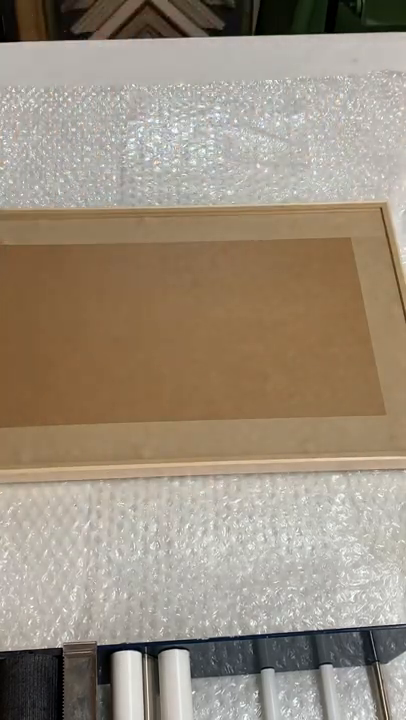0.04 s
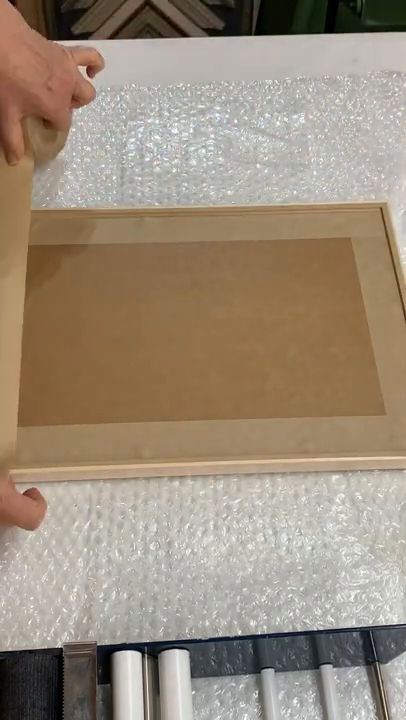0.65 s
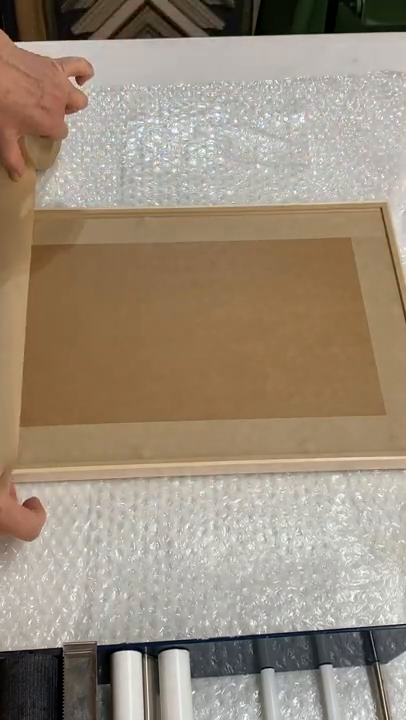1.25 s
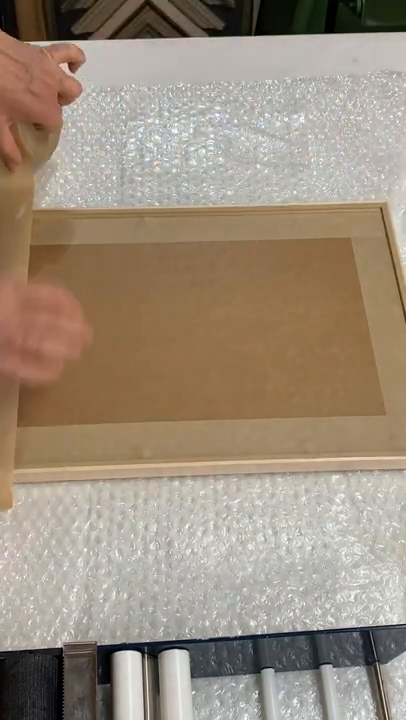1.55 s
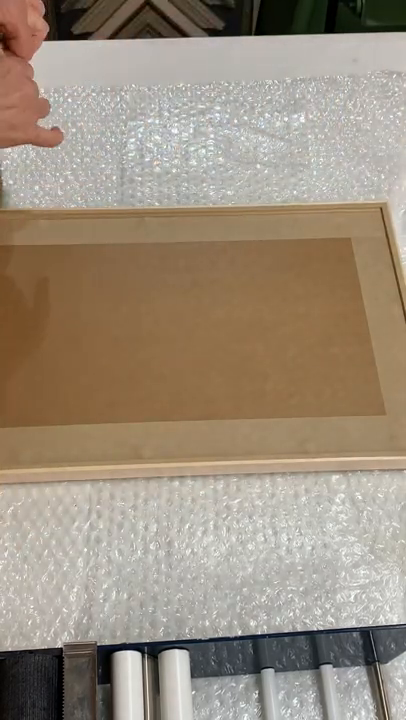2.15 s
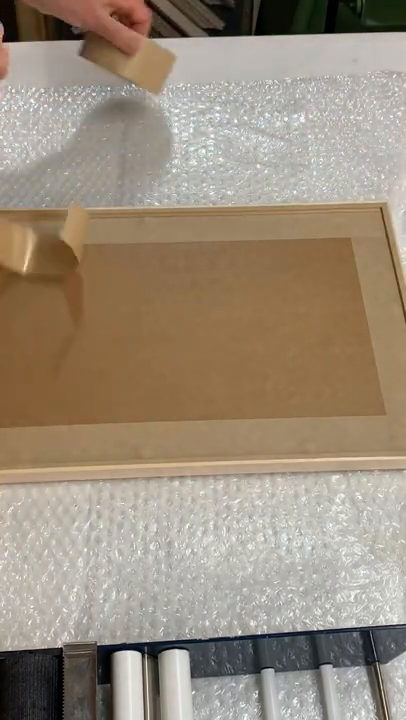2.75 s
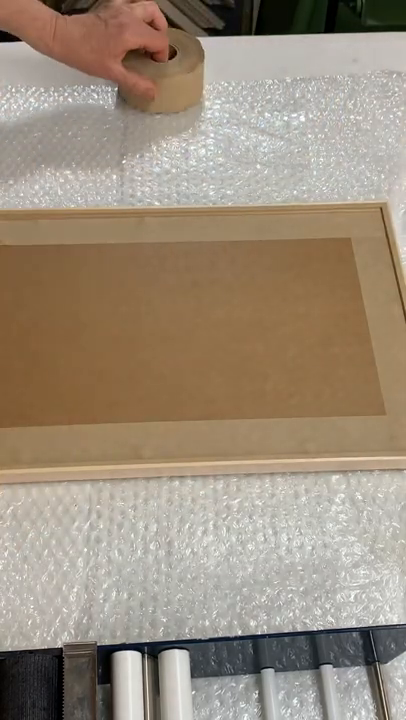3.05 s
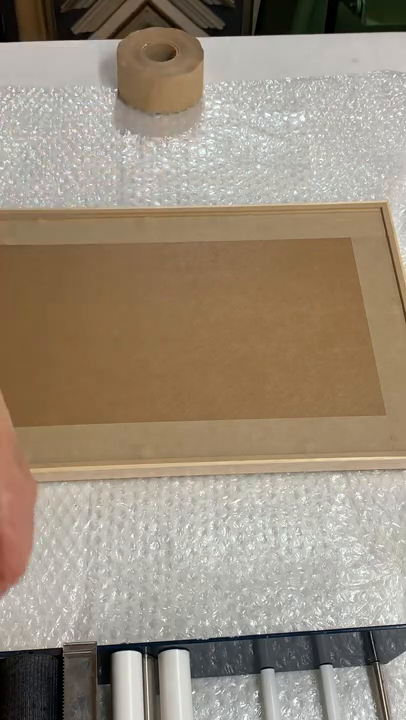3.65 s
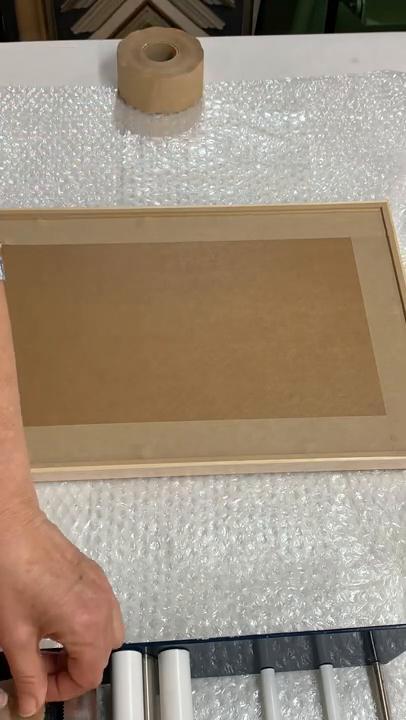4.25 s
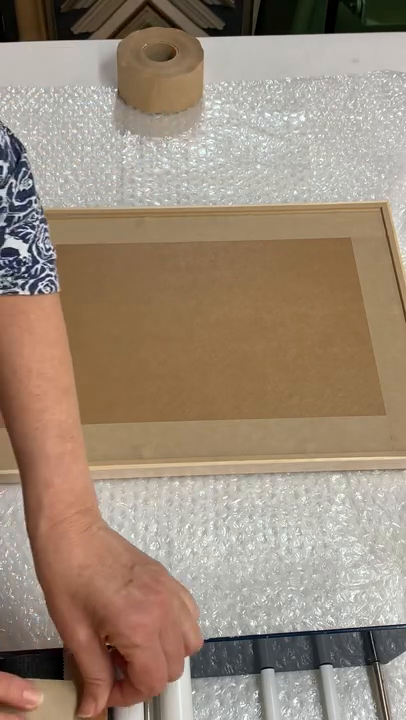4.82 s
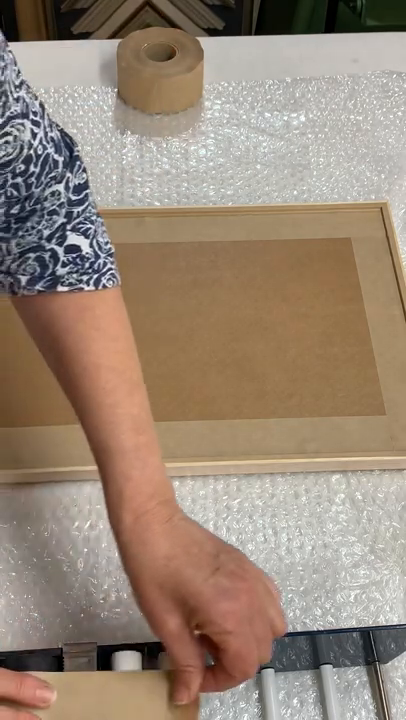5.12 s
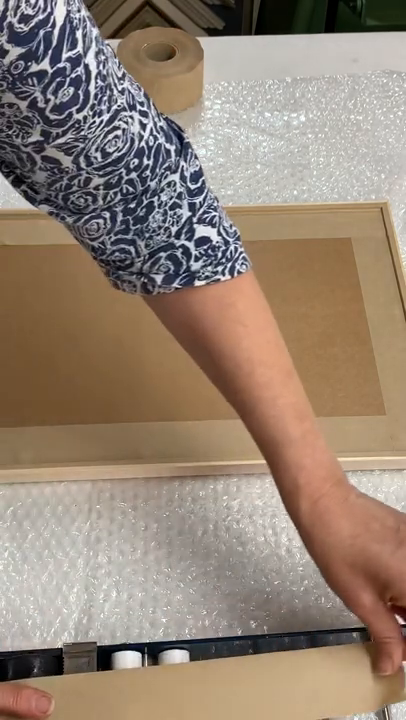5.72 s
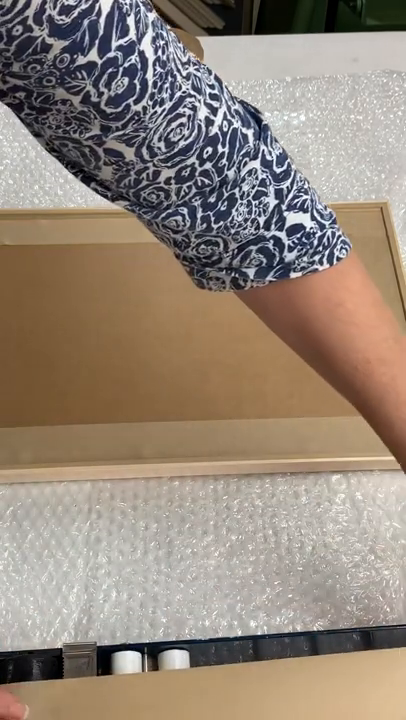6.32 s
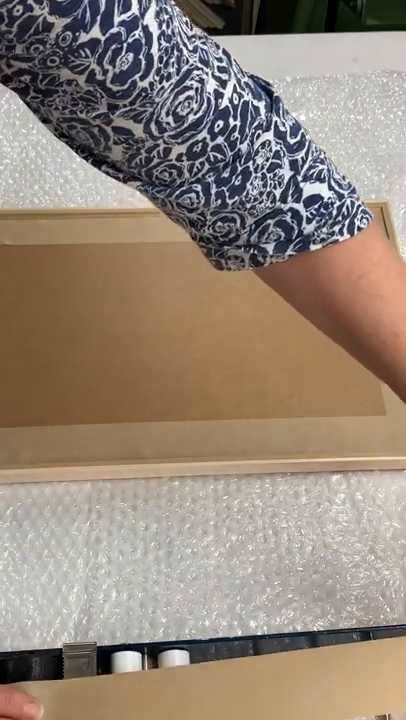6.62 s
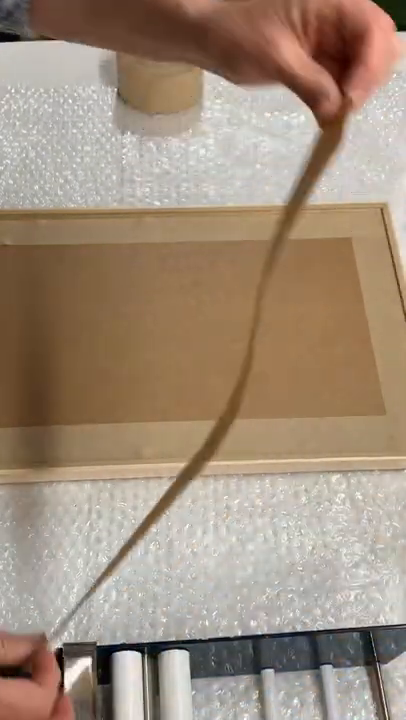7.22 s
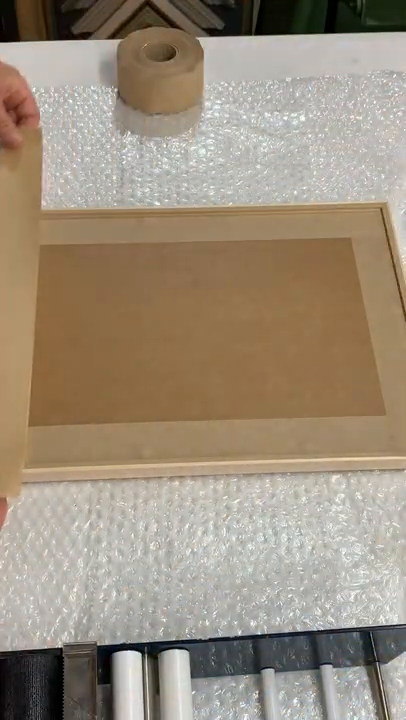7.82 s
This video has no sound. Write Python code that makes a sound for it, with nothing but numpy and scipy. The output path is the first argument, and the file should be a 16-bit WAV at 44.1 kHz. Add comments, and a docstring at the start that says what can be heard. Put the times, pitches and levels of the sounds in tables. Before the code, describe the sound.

In a small, quietly rumbling workshop, a short rasp of unrolling paper tape is followed by soft rubbing, sharp crinkles and a quick rip. Bubble wrap rustles under the roll and small bumps sound on the bench. Then, close by, the strip slides through a roller moistener with a hiss and a wavering, whistle-like squeak. It comes free with a thin metallic clink and a few faint paper rustles.

```python
"""A framing bench in a small workshop, where someone works with gummed paper tape.
The tape rasps off its roll, rustles as hands smooth it along the frame, then creaks and tears, fibre
by fibre. The roll is set down on bubble wrap. The strip hisses through a moistener whose roller sticks
and slips, which makes it squeal, and a metal part clinks as the strip comes free.
Small bumps ring the bench, and the room rumbles softly underneath."""
import sys
import numpy as np
from scipy import signal
from scipy.fft import rfft, irfft, next_fast_len
from scipy.io import wavfile

SR = 44100
rng = np.random.default_rng(int(sys.argv[2]) if len(sys.argv) > 2 else 0)


def generate_wav(signal):
    """Clip the signal to [-1, 1] and save it as 16-bit WAV at the path in sys.argv[1]."""
    frames = np.transpose(np.atleast_2d(signal))
    scaled = np.clip(frames, -1, 1) * 32767
    pcm = np.round(scaled).astype(np.int16)
    wavfile.write(sys.argv[1], SR, pcm)


N = 347085
TIME = np.arange(N) / SR
SIZE = next_fast_len(N + SR)
FREQS = np.arange(SIZE // 2 + 1) * SR / SIZE

# An attack is the time a sound takes to build up; a t60 is the time it takes to fade by 60 dB.
STROKE_ATTACK_S, STROKE_T60_S = 0.032, 0.12   # a hand moving over the paper
FEED_ATTACK_S, FEED_T60_S = 0.04, 0.15   # the strip moving through the moistener

# A colour says how strong the low and high frequencies of a sound are, compared with each other.
# bright crinkling paper: f/Hz, level/dB
CRINKLE_COLOUR = [(1500, -44), (4000, -13), (6500, -6.5), (8500, 4), (11000, -0.5), (15500, -6)]
# rustling bubble wrap, also used for the paper's ticks: f/Hz, level/dB
WRAP_COLOUR = [(300, -8.5), (700, -9.5), (1300, 2.5), (3000, 4), (5000, 9.5), (7000, 1.5), (8700, 10),
               (11000, 2.5), (15500, -2)]
# paper dragging over a surface: f/Hz, level/dB
DRAG_COLOUR = [(300, -19), (600, -2.5), (850, -14), (2000, -4), (3500, 1.5), (5500, 8), (7000, 5),
               (9000, 4.5), (11500, 3), (13500, 1), (15500, 0.5)]


def from_db(db):
    """Turn decibels into a number to multiply by."""
    return 10 ** (np.asarray(db) / 20)


def rms_one(x):
    """Scale a signal so that its average power is one."""
    return x / np.sqrt(np.mean(x ** 2) + 1e-20)


def level(rows, column=1):
    """Join a table's dB values into a gain over time, fading to silence outside its first and last row."""
    rows = np.array(rows)
    outside_s = np.maximum(rows[0, 0] - TIME, TIME - rows[-1, 0])
    return from_db(np.interp(TIME, rows[:, 0], rows[:, column])) * np.clip(1 - outside_s / .008, 0, 1)


def at_freqs(points):
    """Join a table's points with straight lines on a log-frequency axis."""
    hz, value = np.transpose(points)
    return np.interp(np.log(FREQS + 1), np.log(hz), value)


def colour(x, spectrum):
    """Give a sound a colour; white noise keeps its power."""
    return irfft(rfft(x, SIZE) * rms_one(from_db(at_freqs(spectrum))), SIZE)[..., :N]


def drift(rate_hz):
    """A smooth random wobble, about one in size; a higher rate wobbles faster."""
    step = 20   # samples between random values
    pole = np.exp(-2 * np.pi * rate_hz * step / SR)
    slow = signal.lfilter([1], [1, -2 * pole, pole * pole], rng.standard_normal(N // step + 2002))[2000:]
    return np.interp(np.arange(N) / step, np.arange(len(slow)), rms_one(slow))


def noise(width):
    """Stereo white noise; width is the size of the part that differs between left and right."""
    mid, side = rng.standard_normal((2, N))
    return rms_one(mid + width * side * np.array([[1], [-1]]))


def grains(per_s, spread_db, smooth):
    """Fibres letting go: random clicks of uneven size, plus a share of smooth rubbing noise."""
    sizes = from_db(spread_db * np.minimum(rng.exponential(1, N), 4)) * rng.choice([-1, 1], N)
    clicks = rms_one(sizes * (rng.random(N) < per_s / SR))
    return rms_one(clicks + smooth * noise(width=0.96))


def ring(x, hz, t60):
    """One note of an object: every click in x starts a fading sine wave."""
    decay, turn = from_db(-60 / (t60 * SR)), 2 * np.pi * hz / SR
    return signal.lfilter([0, np.sin(turn)], [1, -2 * decay * np.cos(turn), decay * decay], x + 1e-18)


def burst(start, t60, rise):
    """Loudness of one hit: it rises quickly, then dies away."""
    out, at = np.zeros(N), int(start * SR)
    age = TIME[:min(N - at, SR // 2)]
    out[at:at + len(age)] = (1 - np.exp(-age / rise)) * np.exp(-np.log(1000) * age / t60)
    return out


def crack(start, t60, rise, tail_t60, tail_db):
    """Loudness of a brief crack with a weaker tail."""
    return burst(start, t60, rise) + from_db(tail_db) * burst(start, tail_t60, rise)


def gesture(start, length, attack, t60):
    """Loudness of one movement: it builds up, holds, then dies away."""
    age = TIME - start
    return np.clip(age / attack, 0, 1) * from_db(-60 * np.clip((age - length) / t60, 0, 2))


def over_bench(x, lag_s, echo_db, wander=0.186):
    """The bench top throws back an echo whose path changes as the hands move, so the colour shifts."""
    delay = lag_s * SR * np.exp(wander * drift(1.5))
    echo = np.array([np.interp(np.arange(N) - delay, np.arange(N), side) for side in x])
    return (x + from_db(echo_db) * echo) / np.sqrt(1 + from_db(2 * echo_db))


def rumble(steady_db=-74, uneven_db=2.5):
    """The room rumbles, weight thumps on the bench now and then, and a low shuffling comes and goes."""
    # dull thumps: t/s, level/dB
    thump_rows = [(2.72, -75), (2.961, -59), (3.09, -59.5), (3.71, -53), (4.119, -55), (7.049, -56)]
    # the shuffling: t/s, level/dB
    shuffle_rows = [(0, -62.5), (.3, -74), (.6, -73.5), (1.25, -76), (1.45, -66.5), (2.1, -65.5),
                    (3.45, -71), (3.75, -67.5), (5.2, -62.5), (6.7, -73), (7.1, -64.5), (7.87, -67.5)]
    # the deep rumble, then the shuffling: f/Hz, level/dB
    deep_colour = [(20, -26.5), (40, -2), (60, 4.5), (95, 6.5), (150, 0.5), (250, -0.5), (340, -9),
                   (480, -24.5), (900, -33.5), (3000, -33.5)]
    shuffle_colour = [(50, -30.0), (150, -17.5), (260, -2.0), (500, -14.5), (2000, -26.5)]
    thumps = sum(from_db(db) * burst(s, t60=0.27, rise=0.003) for s, db in thump_rows)
    shuffle = level(shuffle_rows)
    deep = colour(noise(width=.14), deep_colour)
    wide = colour(noise(width=1.56), shuffle_colour)
    deep_gain = from_db(steady_db) + from_db(-2) * shuffle + thumps
    wide_gain = from_db(-1 + uneven_db * drift(19)) * shuffle
    return deep_gain * deep + wide_gain * wide


def unroll(draw_s=0.57, full_speed_db=-35, catch_db=-9):
    """Tape leaves the roll with a fine rasp and small catches; both follow the speed of the arm."""
    # the bright rasp: f/Hz, level/dB
    rasp_colour = [(200, -21), (500, -15.5), (1000, -17), (2200, -13), (3000, -9), (4000, 2.5),
                   (6000, -4.5), (8200, 0.5), (11000, 1), (15500, -1.5)]
    speed = np.abs(np.sin(np.pi * np.minimum(TIME / draw_s, 1)))
    rasp = grains(per_s=6500, spread_db=5.0, smooth=1.0) * from_db(1.3 * drift(22))
    catches = from_db(catch_db) * grains(per_s=300, spread_db=2.5, smooth=0)
    tape = colour(rms_one(rasp + catches), rasp_colour)
    return from_db(full_speed_db) * speed ** 0.86 * over_bench(tape, lag_s=.0022, echo_db=-6.5)


def ticks(per_s=9, tick_db=-76, fade_s=0.0037):
    """The loose strip ticks faintly at random as it is laid along the frame."""
    clicks = np.abs(grains(per_s=per_s, spread_db=3.0, smooth=0)[0])
    cracks = signal.lfilter([1], [1, -np.exp(-1 / (fade_s * SR))], clicks + 1e-18) * noise(width=1.0)
    laying = gesture(start=.75, length=1, attack=STROKE_ATTACK_S, t60=STROKE_T60_S)
    return from_db(tick_db) * laying * rms_one(colour(cracks, WRAP_COLOUR))


def snaps():
    """Paper buckles: each snap is a short shower of tiny clicks with a crisp part and a dull part."""
    # the snaps: t/s, relative level/dB, extra level of the dull part/dB, t60/s
    snap_rows = [(0.798, -60, 8, 0.01), (0.877, -36, -14, 0.0065), (1.02, -47, 10, 0.012),
                 (1.185, -61, 6, 0.02), (1.249, -47, -16, .01), (1.272, -45, 6.5, 0.015),
                 (1.364, -43, 0, 0.031), (1.3849, -20.5, 2.5, 0.0094), (1.3909, -30.5, 10, 0.0071),
                 (1.462, -44, 6.5, 0.094), (1.860, -50, 18, .012), (2.003, -40, -7, 0.095),
                 (2.077, -44, -2, 0.087), (2.118, -32, -5, 0.014), (2.220, -32, -11, 0.016),
                 (2.241, -9, -15.5, 0.023), (2.249, -13, -32, 0.017), (2.277, -19, -20, .008),
                 (2.361, -20, -18, .008), (2.641, -33.5, 10.5, 0.015), (2.647, -35, 4, 0.018),
                 (2.655, -25.5, -23, 0.087), (2.698, -24, -3.5, 0.019), (2.766, -54, 11, 0.017),
                 (2.83, -46.5, 14, 0.016), (2.8707, -7.5, -20, 0.0065), (3.209, -34.5, -6.5, 0.053),
                 (3.214, -27.5, 0, 0.033), (3.915, -19, -4, 0.019), (4.417, -27.5, -12, .015),
                 (4.475, -37, 3, 0.018), (4.946, -40.5, 8.5, 0.014), (6.468, -26.5, -14, 0.031),
                 (6.526, -34, -31, 0.012), (6.785, -35, -28, 0.021), (7.032, -31.5, -13, 0.14),
                 (7.196, -42.5, -8, 0.041), (7.251, -43, -18, .02), (7.494, -37.5, -7, 0.083)]
    # the dull part: f/Hz, level/dB
    dull_colour = [(300, -14), (700, -5.5), (1200, 0), (2000, 0.5), (3700, 4), (6000, 3), (12000, -57)]
    crisp, dull = np.zeros((2, N))
    for s, db, dull_db, t60 in snap_rows:
        crisp += from_db(db) * crack(s, t60, rise=0.00025, tail_t60=0.12, tail_db=-35)
        dull += from_db(db + dull_db) * crack(s, t60, rise=0.00066, tail_t60=0.065, tail_db=-22)
    shower = grains(per_s=4100, spread_db=-4.0, smooth=2.4)
    return (from_db(-11.0) * colour(crisp * shower, CRINKLE_COLOUR)
            + from_db(-7.5) * colour(dull * shower, dull_colour))


def handling():
    """Hands smooth and carry the strip: skin rubs softly while the paper crinkles."""
    # hand strokes: t/s, length/s, relative rub level/dB, relative crinkle level/dB
    strokes = [(0.883, 0.06, -66.5, -81), (1.055, 0.087, -74.5, -90), (1.358, 0.12, -59.5, -64.5),
               (1.48, 0.089, -64, -84), (1.6, 0.069, -64, -100), (1.781, 0.13, -65, -80),
               (1.949, 0.21, -64.5, -79), (6.783, 0.052, -61.5, -53.5), (7.116, 0.096, -68, -72.5),
               (7.233, 0.1, -74, -87), (7.468, 0.059, -58.5, -57), (7.528, 0.13, -63.5, -83),
               (7.793, 0.061, -66, -71)]
    # skin on paper: f/Hz, level/dB
    rub_colour = [(300, 1.5), (700, -35), (1400, -2), (2200, -3.5), (3300, 5.5), (5000, 10.5),
                  (7000, -10.5), (10000, -51), (15000, -47)]
    soft, crisp = np.zeros((2, N))
    for s, length, rub_db, crinkle_db in strokes:
        stroke = gesture(s, length, STROKE_ATTACK_S, STROKE_T60_S)
        soft += from_db(rub_db) * stroke
        crisp += from_db(crinkle_db) * stroke
    pressure = from_db(3.84 * drift(55))
    rub = colour(soft * pressure * grains(per_s=1300, spread_db=-3.0, smooth=2.0), rub_colour)
    crinkle = colour(crisp * pressure * grains(per_s=1500, spread_db=-8.0, smooth=0.32), CRINKLE_COLOUR)
    return from_db(6.0) * rub + from_db(5.0) * crinkle


def knocks(ring_db=-38, hollow_db=-4, spot_db=4):
    """Each bump is a scuff with a hollow note; the spot it lands on changes how the bench rings."""
    # bumps on frame, bench and moistener: t/s, relative level/dB, centre f/Hz, t60/s
    bumps = [(1.86, -20.5, 1730, 0.013), (2.24, -37, 700, 0.11), (2.539, -31.5, 550, 0.063),
             (3.062, -34, 1280, 0.038), (3.214, -29, 2230, 0.044), (3.529, -34, 1880, 0.018),
             (3.705, -41.5, 1170, 0.067), (3.712, -43, 220, .1), (3.781, -38, 705, 0.016),
             (3.913, -30, 1360, 0.072), (4.07, -31.5, 1170, 0.027), (4.124, -41, 520, 0.06),
             (4.128, -39, 257, 0.12), (4.3, -42.5, 640, 0.16), (4.378, -20.5, 1370, 0.022),
             (4.476, -34, 1130, 0.052), (4.597, -41, 804, 0.053), (4.897, -39, 620, 0.028),
             (4.944, -41, 546, .05), (5.035, -41.5, 200, 0.13), (5.437, -49, 520, .05),
             (5.633, -43, 546, 0.09), (6.007, -41, 950, .04), (6.012, -46, 260, .12),
             (6.413, -46.5, 710.5, 0.12), (6.881, -41, 906, 0.16), (6.901, -35, 1160, 0.041),
             (7.037, -29.5, 1490, 0.061), (7.157, -41.5, 1400, 0.061), (7.379, -51.5, 870, 0.22),
             (7.67, -44, 1216, 0.084), (7.729, -41, 1240, 0.095)]
    # notes of the bench and the things on it: f/Hz, relative level/dB, t60/s
    bench_notes = [(552, -10, 0.12), (830, -24, 0.044), (1020, -18.5, 0.12), (1284, -5, 0.054),
                   (1800, -6, 0.03), (1905, -1, 0.02), (2430, -10, 0.028), (2690, -25, 0.044)]
    white, force = noise(width=0.62), np.zeros((2, N))
    for s, db, hz, t60 in bumps:
        band = signal.butter(1, [hz / 2, min(hz * 1.62, SR / 3)], "band", fs=SR, output="sos")
        hollow = rms_one(signal.lfilter(*signal.iirpeak(hz, Q=7, fs=SR), white))
        scuff = rms_one(rms_one(signal.sosfilt(band, white)) + from_db(hollow_db) * hollow)
        force += from_db(db) * burst(s, t60, rise=0.08 * t60) * scuff   # soft bumps rise and fade slowly
    force = signal.sosfilt(signal.butter(2, 3500, fs=SR, output="sos"), force)
    body = np.zeros((2, N))
    for hz, db, t60 in bench_notes:
        spot = from_db(spot_db * np.tanh(drift(3)))
        body += from_db(db) * ring(force * spot, hz, t60)
    return from_db(-7.5) * (force + from_db(ring_db) * body)


def creak(fade_s=0.00096):
    """Just before it tears, the tight paper sticks and slips under a finger."""
    # the creak: t/s, slips per second, relative level/dB
    creak_rows = [(2.119, 170, -42), (2.143, 110, -42), (2.175, 110, -42), (2.2, 130, -56)]
    s, per_s, _ = np.transpose(creak_rows)
    rate = np.interp(TIME, s, per_s) * from_db(0.44 * drift(36))
    slip_count = np.floor(np.cumsum(rate) / SR)
    slips = np.diff(slip_count, prepend=0) * level(creak_rows, column=2)
    scuffs = signal.lfilter([1], [1, -np.exp(-1 / (fade_s * SR))], slips) * noise(width=0.49)
    return from_db(-7) * colour(scuffs, DRAG_COLOUR)


def tear(fast_tear_db=-27.5, single_fibres_db=-4.5):
    """Fibres break in clumps and shake the tight sheet; single ones stand out while the tear is slow."""
    # the tear crossing the strip: t/s, relative crackle level/dB, relative sheet level/dB
    tear_rows = [(2.239, -58, -48.5), (2.242, -38.5, -39.5), (2.315, -42.5, -55.5), (2.417, -37.5, -59.5),
                 (2.46, -30.5, -47.5), (2.499, -22.5, -43), (2.549, -33, -34.5), (2.577, -58.5, -60.5),
                 (2.6, -61.5, -60)]
    # slow tearing, fast tearing and the flapping sheet: f/Hz, level/dB
    slow_colour = [(600, -37.5), (1200, -11), (2200, -17.5), (3400, -4.5), (5500, -16.5), (7300, -11.5),
                   (8400, 0.5), (10000, -5.5), (11700, 2.5), (13300, 0), (15500, -8)]
    fast_colour = [(600, -38), (1100, -14), (2200, -14.5), (5000, -10), (6300, -3.5), (7200, -5),
                   (8100, 3.5), (9100, -3.5), (10700, -4.5), (12200, -4.5), (13200, -7), (14500, -14),
                   (15500, -15.5)]
    sheet_colour = [(250, -20.5), (420, -22.5), (540, 13.5), (680, -1.5), (850, 6), (1250, 3.5), (1650, -6),
                    (2800, -7.5), (5000, -6)]
    breaks = grains(per_s=8900, spread_db=5.0, smooth=1.0) * from_db(1.3 * drift(197))
    force = level(tear_rows)
    fast = np.clip(force / from_db(fast_tear_db), 0, 1) ** 2   # 1 when the tear runs freely
    single = from_db(single_fibres_db) * grains(per_s=470, spread_db=5.0, smooth=0)
    slow_crackle = colour((breaks + single) * force * np.sqrt(1 - fast), slow_colour)
    fast_crackle = colour(breaks * force * np.sqrt(fast), fast_colour)
    sheet = colour(breaks * level(tear_rows, column=2), sheet_colour)
    return from_db(1.0) * (slow_crackle + fast_crackle) + from_db(-4.5) * sheet


def bubble_wrap():
    """Plastic bubbles rustle as the roll is carried over them and set down."""
    # roll and hand brush the wrap: t/s, length/s, relative level/dB
    brushes = [(2.638, 0.063, -47), (2.711, 0.095, -63), (2.865, 0.18, -56.5), (3.046, 0.019, -52),
               (3.192, 0.015, -66), (3.702, 0.11, -66)]
    touch = sum(from_db(db) * gesture(s, length, attack=0.006, t60=0.28) for s, length, db in brushes)
    rustle = grains(per_s=1400, spread_db=-3.5, smooth=0.93) * from_db(1.0 * drift(40))
    return from_db(2.5) * colour(rustle * touch, WRAP_COLOUR)


def feeding(slowing_db_per_s=4.5):
    """The strip's speed through the moistener, as a gain: each move slows as the arm stretches out."""
    # short pushes, then one long pull: t/s, length/s, relative level/dB
    moves = [(3.876, 0.03, -39.5), (3.943, 0.082, -50), (4.066, 0.046, -52), (4.135, 0.025, -52),
             (4.206, 0.02, -56), (4.296, 0.014, -49), (4.359, 0.063, -61), (4.506, 0.1, -49.5),
             (4.931, 1.49, -47.5)]
    feed = np.zeros(N)
    for s, length, db in moves:
        slowing_db = slowing_db_per_s * np.maximum(TIME - s, 0)
        feed += from_db(db - slowing_db) * gesture(s, length, FEED_ATTACK_S, FEED_T60_S)
    return feed


def drag(feed, waver_db=5.5):
    """The strip hisses over the moistener's edge; the metal's notes come and go as the contact shifts."""
    # notes of the thin sheet metal: f/Hz, relative level/dB
    metal_notes = [(3350, 4.5), (3800, -1.5), (5400, 12), (5880, 8), (6150, 8.5), (6400, 8.5), (6550, 18),
                   (6680, 19), (6930, 19), (7280, 18), (7550, -1.5), (7730, 5.5)]
    friction = grains(per_s=3500, spread_db=-6.5, smooth=1.0) * from_db(0.74 * drift(29)) * feed
    scrape = noise(width=1.0)
    metal = sum(from_db(db + waver_db * drift(4.6)) * ring(scrape, hz, t60=0.11) for hz, db in metal_notes)
    # near its end the strip presses harder on the edge
    end_press = gesture(start=6.15, length=0.31, attack=0.12, t60=FEED_T60_S)
    pressure = from_db(-8) * feed + from_db(-55.5) * end_press
    hiss = over_bench(colour(friction, DRAG_COLOUR), lag_s=.0016, echo_db=-5.5)
    return from_db(3.5) * (hiss + pressure * rms_one(metal))


def chatter(feed, rough_grip):
    """The turning roller rasps in uneven slips, more under a fast strip or a rough squeal."""
    # one long turn, then a flick from the strip's end: t/s, length/s, relative level/dB, t60/s
    turns = [(3.91, 2.29, -62, 3.6), (6.786, 0.064, -57.5, 0.086)]
    # the roller's broad ring: f/Hz, level/dB
    roller_colour = [(700, -73), (950, -10), (1150, 0), (1380, 3.5), (1600, -2), (1740, -2.5), (1880, -8),
                     (2500, -15.5)]
    turning = sum(from_db(db) * gesture(s, length, FEED_ATTACK_S, t60) for s, length, db, t60 in turns)
    effort = turning + from_db(-19) * feed + from_db(-18) * rough_grip
    slips = grains(per_s=720, spread_db=3.0, smooth=1.0) * from_db(2.0 * drift(62))
    return from_db(-0.5) * colour(effort * slips, roller_colour)


def gripping():
    """Strength, pitch and roughness of the roller's squeals; where two overlap, the stronger wins."""
    # squeals: t/s, length/s, attack/s, level/dB, first f/Hz, last f/Hz, roughness from 0 to 1
    squeals = [(4.53, 0.0949, 0.043, -40.5, 1780, 1618, 0.4), (4.792, 0.027, 0.017, -42.5, 1735, 1743, 0.3),
               (4.978, 0.095, 0.054, -38, 1747, 1636, 0.6), (5.107, 0.05, 0.0098, -46.5, 1721, 1669, 0.57),
               (5.176, 0.046, 0.024, -38, 1709, 1730, 0.34), (5.211, 0.068, 0.016, -33, 1613, 1608, 0.19),
               (5.291, 0.2, 0.0085, -41, 1580, 1565, 0.65), (5.507, 0.11, 0.036, -35.5, 1519, 1608, .45),
               (5.636, 0.054, 0.015, -39, 1610, 1657, 0.43), (5.726, 0.068, .01, -57.5, 1660, 1666, 0.49),
               (5.792, 0.2, .006, -33, 1584, 1576, 0.16), (5.985, 0.12, .008, -42.5, 1577, 1595, 0.25),
               (6.123, 0.09, 0.026, -41, 1570, 1589, 0.43), (6.225, 0.089, 0.021, -34, 1577, 1600, 0.22),
               (6.317, 0.047, .008, -42, 1571, 1648, 0.05), (6.402, 0.1, 0.02, -46.5, 1607, 1580, 0.41)]
    strength, pitch, rough = np.zeros((3, N))
    for s, length, attack, db, first_hz, last_hz, roughness in squeals:
        grip = from_db(db) * gesture(s, length, attack, t60=0.037)
        wins = grip > strength
        strength[wins], rough[wins] = grip[wins], roughness
        pitch[wins] = np.interp(TIME[wins], [s, s + length], [first_hz, last_hz])
    return strength, pitch, rough


def squeal(strength, free_pitch, rough, max_sag_hz=72.3, firm_grip_db=-34, grab_s=0.0035):
    """The roller sticks and slips so fast that it sings; a firm grip or a sudden grab lowers the note."""
    # the roller's hardest grabs: t/s, level/dB, drop in pitch/Hz
    grabs = [(4.588, -32, 42), (5.062, -32.5, 75), (5.341, -30, 40), (5.382, -40, 130), (5.438, -30, 85),
             (5.532, -27.5, 72), (5.799, -31.5, 27), (5.881, -26, 20.5), (5.91, -29.5, 13),
             (5.943, -25, 31.5), (6.03, -34.5, 47), (6.165, -34, 27), (6.274, -28.5, -1.5)]
    loudness = strength * from_db(7.5 * rough * np.tanh(drift(81)))
    yank_hz = np.zeros(N)
    for s, peak_db, drop_hz in grabs:
        hold = np.exp(-np.minimum(((TIME - s) / grab_s) ** 2, 20))
        loudness += hold * (from_db(peak_db) - loudness)
        yank_hz += hold * drop_hz
    sag_hz = max_sag_hz * np.tanh(loudness / from_db(firm_grip_db))
    jitter_hz = 20 * rough * drift(157) ** 2
    phase = 2 * np.pi * np.cumsum(free_pitch - sag_hz - yank_hz - jitter_hz) / SR
    # uneven slips add a rough band of noise 120 Hz below the note
    rasp = from_db(-1) * rough * strength * drift(44) * np.sin(phase - 2 * np.pi * 120 * TIME)
    # the slips keep changing shape, which blurs the overtones
    blurred = phase + 0.5 * drift(90)
    overtones = from_db(-26) * np.sin(2 * blurred) + from_db(-27) * np.sin(3 * blurred)
    overtones *= from_db(4.0 * np.tanh(drift(120)))
    return loudness * (np.sin(phase) + overtones) + rasp


def moistener():
    """The moving strip hisses while the roller squeals and chatters."""
    feed = feeding()
    strength, free_pitch, rough = gripping()
    return drag(feed) + squeal(strength, free_pitch, rough) + chatter(feed, strength * rough)


def clink(start_s=7.033, waver_db=2.0):
    """A small metal part springs back and rings thinly, each note wavering as the part rocks."""
    # its low body and thin overtones: f/Hz, level/dB, t60/s, rise/s
    notes = [(884, -38, 0.072, 0.013), (1372, -48, 0.27, 0.015), (1569, -31, 0.047, 0.011),
             (1950, -23.5, 0.026, 0.0081), (5378, -43.5, 0.093, 0.0018), (6330, -56, 0.27, 0.0035),
             (8930, -37, 0.25, 0.0039), (10540, -27.5, 0.27, 0.053), (11480, -44, 0.067, 0.0018),
             (11830, -45, 0.16, .002), (13900, -45, 0.31, .04)]
    return sum(from_db(db + waver_db * drift(25)) * burst(start_s, t60, rise) * np.sin(2 * np.pi * hz * TIME)
               for hz, db, t60, rise in notes)


def room_echo(x, t60=0.15):
    """The workshop adds a short wash of echoes, different on each side and duller than the sound itself."""
    age = TIME[:SR // 2]
    tail = rng.standard_normal((2, len(age))) * np.exp(-np.log(1000) * age / t60) * (age > .004)
    tail /= np.sqrt(np.sum(tail ** 2, axis=1, keepdims=True))
    echoes = signal.fftconvolve(x, tail, axes=1)[:, :N]
    return signal.sosfilt(signal.butter(1, 5000, fs=SR, output="sos"), echoes)


def scene():
    """Add up the work at the bench, its echoes, and the room's own rumble and hiss."""
    # the room's faint hiss: f/Hz, level/dB
    hiss_colour = [(200, -2), (1000, -8), (2300, 2), (4000, 3.5), (7000, -10), (11000, -19), (15500, -30.5)]
    paper = over_bench(tear(), lag_s=0.0034, echo_db=-2.5)
    paper += over_bench(handling() + bubble_wrap(), lag_s=0.0013, echo_db=-0.5)
    bench = unroll() + paper + creak() + ticks() + snaps() + knocks() + clink()
    near = moistener()   # close to the microphones, so it gets less echo
    hiss = from_db(-85.5) * colour(noise(width=0.75), hiss_colour)
    echoes = room_echo(from_db(-5) * bench + from_db(-6.5) * near)
    return bench + near + echoes + rumble() + hiss


def record(dry, ceiling=.27, cutoff_hz=15750):
    """The sound reaches two microphones: the left runs ahead of the right by a phase that climbs in steps as
    the pitch rises, and the right is a little louder."""
    # how far the left side is ahead: f/Hz, phase/radians
    left_lead = [(0, 0), (1500, .2), (2100, .8), (3000, 1.1), (4000, 2.4), (4400, 3.14), (5000, 3.14),
                 (6400, 6.28), (7500, 6.28), (7950, 8.2), (8500, 9.42), (9350, 9.42), (10450, 12.57),
                 (11650, 12.57), (12600, 15.71), (13600, 15.71), (14600, 18.85), (16500, 18.85)]
    # left level minus right level: f/Hz, level/dB
    balance = [(40, -.5), (120, -3), (330, -3.5), (520, -6), (800, -2.5), (1500, -2), (2400, -1.5),
               (4000, -.4)]
    left, right = rfft(ceiling * np.tanh(dry / ceiling), SIZE)   # rounds off the hardest cracks
    lead = np.interp(FREQS, *np.transpose(left_lead))
    # treble that arrives exactly in step or exactly opposite is alike on both sides
    width = np.maximum(np.abs(np.sin(lead)), FREQS < 3500)
    mid, side = (left + right) / 2, 0.72 * width * (left - right) / 2
    signs = np.array([[1], [-1]])
    pair = (mid + signs * side) * np.exp(signs * 1j * lead / 2)
    pair *= from_db(signs * at_freqs(balance) / 2)
    treble_cut = 1 / np.sqrt(1 + (FREQS / cutoff_hz) ** 300)
    return irfft(pair * treble_cut, SIZE)[:, :N]


dry = scene()
out = record(dry)
generate_wav(out)
```